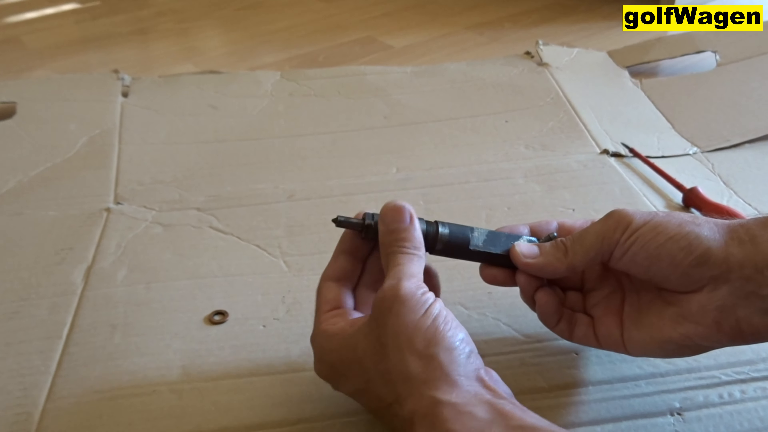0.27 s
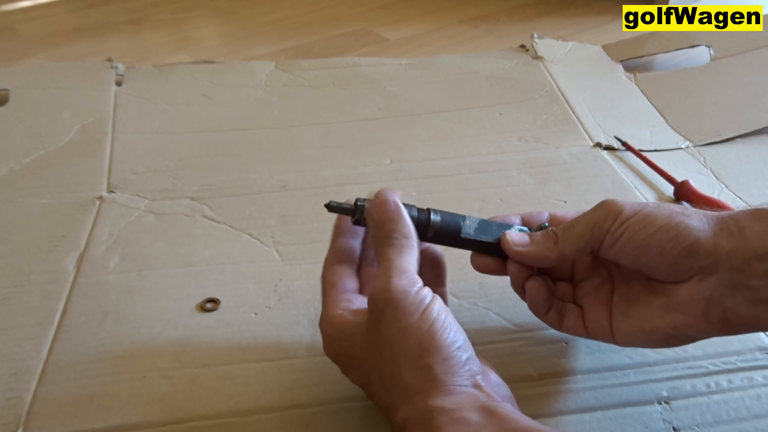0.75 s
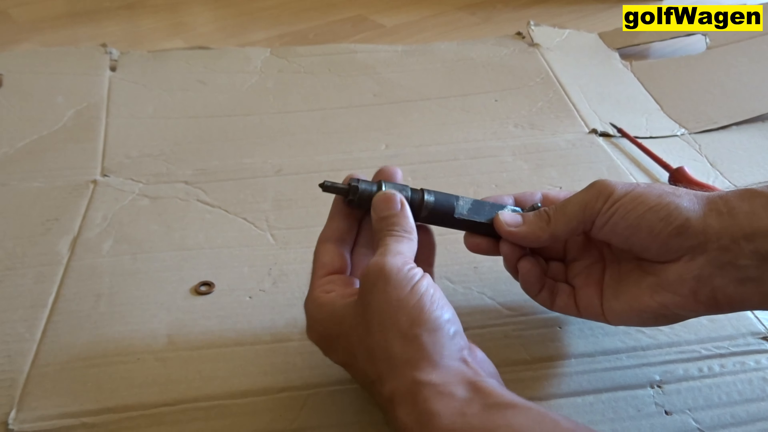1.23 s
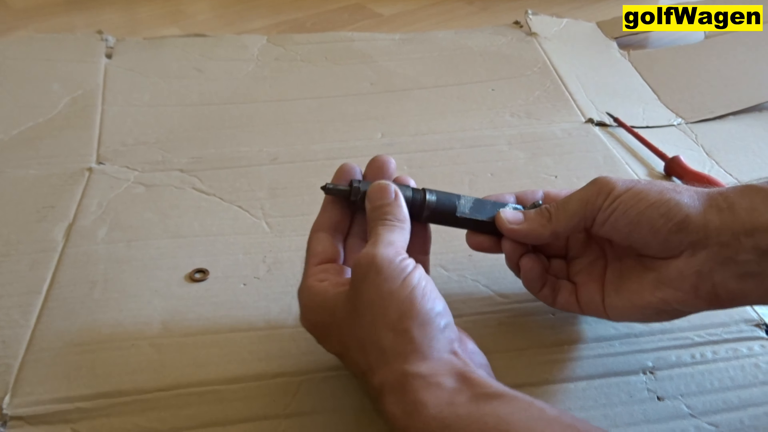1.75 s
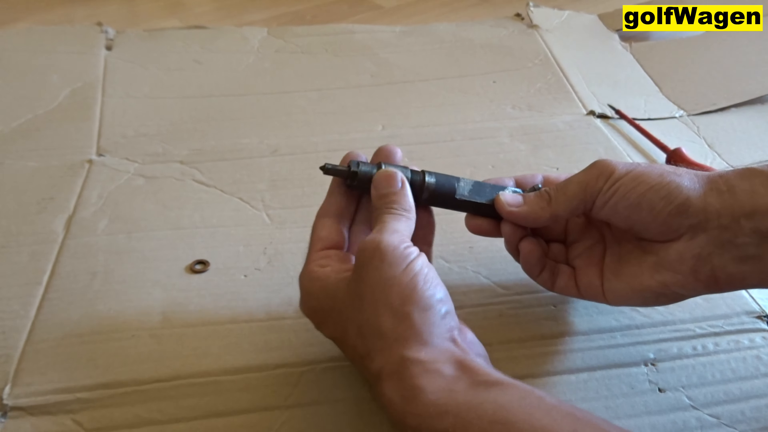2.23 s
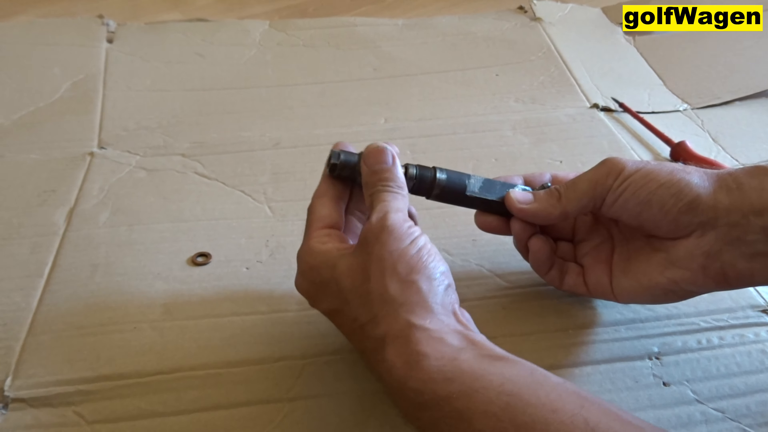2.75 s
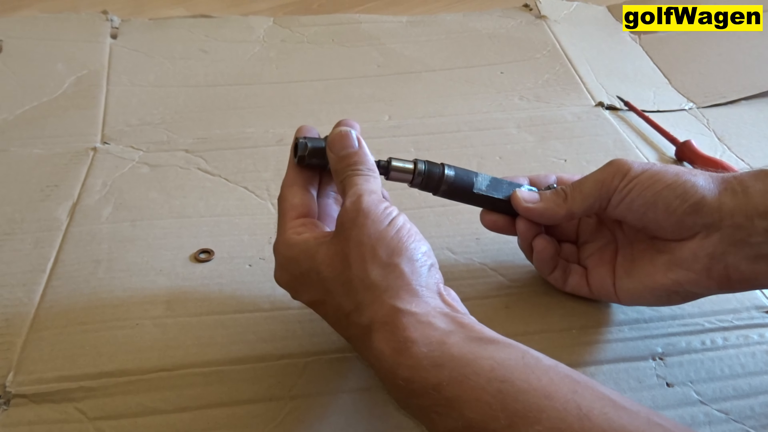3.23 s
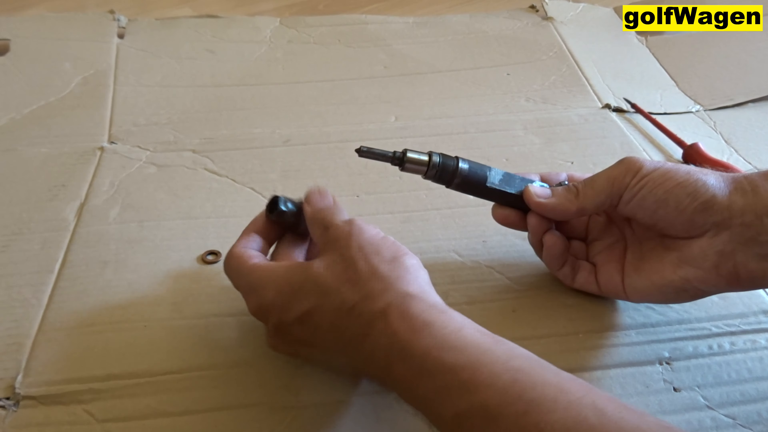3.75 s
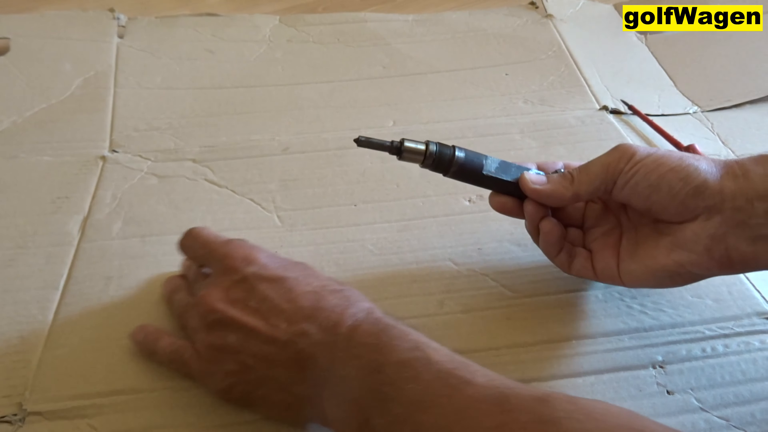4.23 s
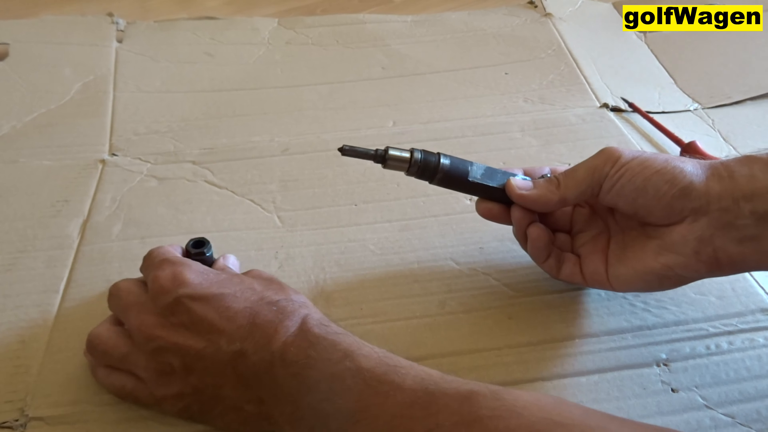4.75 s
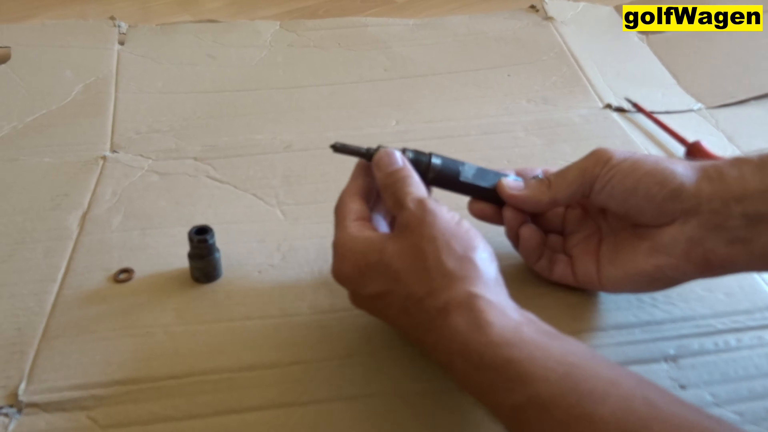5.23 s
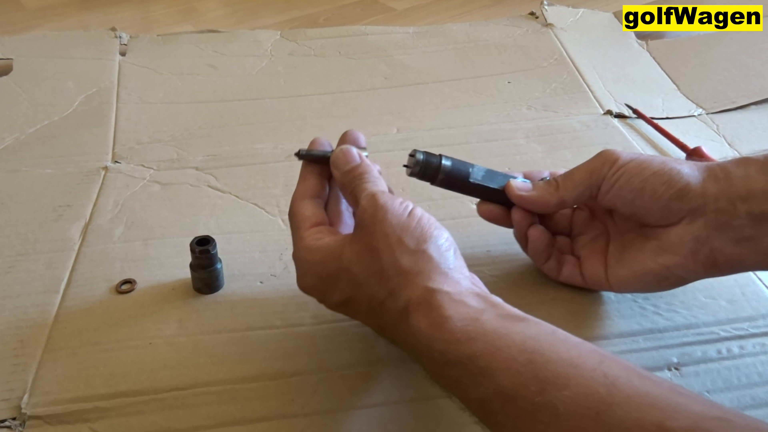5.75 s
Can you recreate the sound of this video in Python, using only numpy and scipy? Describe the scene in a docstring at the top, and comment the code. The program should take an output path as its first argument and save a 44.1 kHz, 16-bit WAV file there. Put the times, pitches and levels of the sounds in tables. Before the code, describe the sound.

A small, quiet room with a soft low hum and faint air noise, heard close in stereo with a light, short reverberation. From 0 to 2.3 s a steel nut is turned by hand in about ten short twists, roughly four per second: thin, dry, high rasps that rise slightly in pitch mid-twist, with crisp ticks between them, growing louder from 1.5 s. A dense burst of bright clicks at 2.3 to 2.5 s marks the nut coming loose; it chatters and clinks with faint ringing at 2.76 and 3.05 s, then a tiny tick at 3.4 s. From 3.8 s skin hisses on cardboard; hollow, woody taps fall at 4.1 to 4.2 s with a stronger papery scrape, and softer taps at 4.6 to 4.7 s. Small brushes follow until 5.2 s, then weak ticks around 5.35 to 5.6 s, soft shuffling, and a faint silky finger glide on steel at 5.8 s.

```python
"""Steel nut twisted off a diesel injector

Heard close up in a small workshop: hand twists rasp as random slips drive thread resonances, and parts tick.
The freed nut chatters off along the nozzle in its own modes, then is stood on cardboard with hollow taps.
A hand brushes the sheet, then fingers slide along the nozzle, both as filtered friction slips.
Shaped noise and narrow low bands make the quiet room hum; noise tails make the reverberation."""
import sys
import numpy as np
from scipy import signal
from scipy.fft import rfft, irfft, next_fast_len
from scipy.io import wavfile

SR = 44100
rng = np.random.default_rng(int(sys.argv[2]) if len(sys.argv) > 2 else 0)


def log_audio(samples):
    """Write samples as a 16-bit WAV file to the path given in sys.argv[1]."""
    # one column per channel
    frames = np.atleast_2d(samples).T
    # limit to full scale, then quantise
    limited = np.clip(frames, -1, 1)
    pcm = np.round(limited * 32767).astype(np.int16)
    wavfile.write(sys.argv[1], SR, pcm)


N = 263717
TIME = np.arange(N) / SR
MID_SIDE = np.array([[1], [-1]])  # sign of the side signal in left and right

# resonances of the injector body: (f/Hz, width/Hz, gain/dB)
BODY_MODES = [(1480, 100, 5.5), (2070, 180, -4.5), (2560, 140, 7), (2840, 1150, 5), (3530, 240, 4.5),
              (4220, 340, -8), (5050, 370, 0.5), (5900, 400, -6), (6400, 270, -18)]
# high resonances of the steel at the thread: (f/Hz, width/Hz, gain/dB)
THREAD_MODES = [(8880, 100, -4.5), (10370, 170, -6), (11180, 135, 1.5), (11630, 120, 0), (12700, 450, -9),
                (14100, 210, -27)]
# resonances of the cardboard sheet: (f/Hz, width/Hz, gain/dB)
SHEET_MODES = [(840, 110, -14), (1000, 45, -1.5), (1133, 120, -2), (1270, 160, -3), (1485, 170, -1),
               (1813, 270, -3.5), (2360, 420, -7)]


def undb(db):
    """Decibels to gain."""
    return 10 ** (np.asarray(db) / 20)


def unit(x):
    """Scale to rms 1."""
    return x / np.sqrt(np.mean(x ** 2))


def crest(x):
    """Scale to peak 1."""
    return x / np.abs(x).max()


def band(x, kind, hz, order):
    """Butterworth filter."""
    sos = signal.butter(order, np.minimum(hz, SR / 2 - 1), kind, fs=SR, output="sos")
    return signal.sosfilt(sos, x)


def colour(x, points):
    """Filter by a spectrum of (f/Hz, gain/dB) points, joined on a logarithmic frequency axis."""
    hz, db = np.transpose(points)
    size = next_fast_len(len(x))
    bins = np.maximum(np.fft.rfftfreq(size, 1 / SR), 1)
    gain = undb(np.interp(np.log(bins), np.log(hz), db))
    return irfft(rfft(x, size) * gain, size)[:len(x)]


def resonate(x, modes):
    """Drive a set of damped modes side by side."""
    out = 0
    for hz, width, db in modes:
        out = out + undb(db) * signal.lfilter(*signal.iirpeak(hz, hz / width, fs=SR), x)
    return out


def walk(rate):
    """Random wander in straight lines between normal draws, rate per second; overall spread about 1.4."""
    knots = np.arange(0, TIME[-1] + 1, 1 / rate)
    return 1.71 * np.interp(TIME, knots, rng.standard_normal(len(knots)))


def wavering(x, modes, depth_db, rate):
    """As the contact point travels, each mode is driven now more, now less."""
    return sum(resonate(x, [mode]) * undb(depth_db * walk(rate)) for mode in modes)


def slips(rate, spread_db, patchy_db, patch_rate):
    """Friction: tiny slips of uneven size, rate per second on average, that come in louder and softer patches."""
    happens = rng.random(N) < rate / SR
    size = undb(spread_db * np.minimum(rng.exponential(size=N), 4))
    patches = undb(patchy_db * walk(patch_rate))
    return unit(happens * size * rng.standard_normal(N) * patches)


def gesture(s, length, db, growth_db, swell_db, attack_s, release_s):
    """Gain of one hand movement: attack, a hold that leans and arches, release (20 dB per attack or release time)."""
    progress = np.clip((TIME - s) / length, 0, 1)
    edges = np.maximum(s - TIME, 0) / attack_s + np.maximum(TIME - s - length, 0) / release_s
    lean = growth_db * (progress - .5)
    arch = swell_db * np.sin(np.pi * progress)
    return undb(db + lean + arch - 20 * np.minimum(edges, 10))


def add(track, s, sound):
    """Mix a short sound in at time s."""
    start = int(s * SR)
    track[start:start + len(sound)] += sound[:N - start]


def air():
    """Shaped room noise flickers slightly over a low hum of noise ringing in narrow bands."""
    # spectrum of the room noise: (f/Hz, gain/dB)
    spectrum = [(15, -23), (45, -6.5), (80, -4.5), (150, 0), (230, -4), (390, -10.5), (520, -3),
                (750, -8.5), (1200, -16), (2000, -18), (3200, -23), (8000, -26.5), (11000, -25),
                (15700, -26.5)]
    # stereo width of the room noise: (f/Hz, gain of the side signal/dB)
    side_spectrum = [(40, -29), (120, -22), (300, -10.5), (600, -6), (2000, -5.5), (12000, -21)]
    # hum resonances: (f/Hz, width/Hz, gain/dB)
    hum_modes = [(112.6, 7, 3), (543.6, 25, -1), (581, 14, -6)]
    air_db = -54.5
    mid, side = (unit(colour(rng.standard_normal(N), spectrum)) for _ in range(2))
    hum = unit(resonate(rng.standard_normal(N), hum_modes))
    flicker = undb(0.53 * walk(5.31))
    mid = undb(-1.5) * mid * flicker + undb(-8.0) * hum
    return undb(air_db) * (mid + colour(side, side_spectrum) * MID_SIDE)


def thread():
    """Dry threads rasp; the slips ring the steel, and the rasp rises in pitch through the middle of each twist."""
    # twists of the nut: (hold start t/s, hold length/s, rasp level/dB, growth from start to end/dB,
    # mid-twist swell/dB, low body modes relative to the rasp/dB)
    twists = [(0.005, 0.032, -47.5, 0, -1.5, -9), (0.235, 0.13, -50.5, 0, 2, -11),
              (0.548, 0.11, -47.5, 9, -1.5, -8.5), (0.874, 0.18, -48.5, 5.5, -10, -9),
              (1.292, 0.11, -48.5, -2.5, -3.5, -7), (1.568, 0.072, -41, 3.5, -2.5, -13.5),
              (1.795, 0.095, -40.5, 7.5, -2, -17), (2.042, 0.062, -43, -5.5, 1, -13.5),
              (2.265, 0.056, -44, 4, -8, -5), (2.327, 0.03, -33, 3, 0.5, -12)]
    attack_s, release_s = 0.029, 0.034  # time to rise or fall by 20 dB
    effort, body_effort, speed = 0, 0, 0
    for s, length, db, growth_db, swell_db, body_db in twists:
        gain = gesture(s, length, db, growth_db, swell_db, attack_s, release_s)
        effort = effort + gain
        body_effort = body_effort + gain * undb(body_db)
        phase = np.interp(TIME, [s - attack_s, s + length + release_s], [0, np.pi])
        speed = speed + np.sin(phase)
    slow_hz, rise_hz, wander_hz = 10300, 1300, 380
    pitch_hz = slow_hz + rise_hz * speed + wander_hz * walk(40)
    turn = np.exp(2j * np.pi * np.cumsum(pitch_hz) / SR)
    grit = slips(rate=5000, spread_db=2.0, patchy_db=1.5, patch_rate=190)
    # a narrow band of grit that follows the moving pitch
    contact = (band(grit / turn, "low", hz=420, order=2) * turn).real
    steel = wavering(grit, THREAD_MODES, depth_db=2.5, rate=41)
    steel = band(band(steel, "high", hz=8400, order=6), "low", hz=14600, order=2)
    rasp = unit(steel) + undb(-3.0) * unit(contact)
    body = wavering(grit, BODY_MODES, depth_db=4.5, rate=25)
    body = band(band(body, "high", hz=1630, order=2), "low", hz=6000, order=3)
    return effort * rasp + body_effort * unit(body)


def thuds():
    """Flesh meeting flesh as the grip changes: a fading noise push gives a short, low bump."""
    # dull thuds: (t/s, peak level/dB)
    grips = [(0.059, -45.5), (0.156, -68), (1.604, -46)]
    out, t = np.zeros(N), TIME[:8192]
    for s, db in grips:
        push = rng.standard_normal(len(t)) * np.exp(-t / 0.0095)
        bump = band(resonate(push, [(147, 81, 0)]), "low", hz=350, order=2)
        add(out, s, undb(db) * crest(bump))
    return out


def ticks(count):
    """Light contacts at chance moments while the fingers feel for the nozzle."""
    first_s, last_s = 5.35, 5.62
    # strike/dB, knock relative to it/dB, snap relative to it/dB, ring/dB, ring f/Hz
    tick = (-48.5, -12, -6, -53, 11206)
    return [(s, *tick) for s in rng.uniform(first_s, last_s, count)]


def clicks():
    """Each contact cracks, knocks the body and rings a high mode that the fingers damp; gives blows and rings."""
    # steel touching steel: (t/s, strike level/dB, body knock relative to the strike before a fixed lift/dB,
    # snap relative to the strike/dB, ring level/dB, ring f/Hz)
    contacts = [(0.2024, -36, 0, -21, -34, 10260), (0.2088, -45, -6, 7, -50, 10100),
                (0.496, -47, 3, 1, -45, 11600), (0.616, -46, -4, -10, -22.5, 10500),
                (1.2243, -28, -24, -11, -33, 10800), (1.236, -30, -7.5, -20, -36, 11300),
                (1.5295, -40.5, 1, -1, -41, 11200), (1.5414, -19, -22, -6.5, -26, 8690),
                (1.561, -40, -3, -15, -23, 8800), (1.6422, -35, -5, -14, -23, 11200),
                (1.771, -41, -17, 9, -43, 11800), (1.7801, -25, -37, -9, -24, 12200),
                (1.8856, -18, -23, -2.5, -7.5, 11050), (1.9894, -32, -28, -10, -47, 11400),
                (2.1178, -21.5, -18, -22, -35, 8900), (2.313, -23, -2.5, -2, -16, 11100),
                (2.3177, -19, -12, -18, -16, 11300), (2.3218, -17.5, -18, -18, -11.5, 10800),
                (2.3635, -12.5, -13, -11, -18, 9960), (2.4879, -19.5, -7, -23, -8.5, 10200),
                (2.7607, -27, -27, -13, -18, 10040), (2.8392, -45.5, 4, 5, -50, 9950),
                (3.025, -39, -11, -6, -28.5, 10020), (3.0445, -29, -14, -5, -35, 10100),
                (3.0503, -14, -14, -13, -14.5, 10070), (3.1525, -44, -1, 1, -35, 10000),
                (3.4218, -44.5, -8.5, -14, -36, 10130)]
    # resonances of the snap: (f/Hz, width/Hz, gain/dB)
    snap_modes = [(4730, 150, 2), (5280, 270, 7), (5870, 410, 2.5), (6760, 800, -29)]
    overtones_db, knock_lift_db = -11.5, 3.5
    held_t60_s = 0.012
    # once off its thread, at free_s, the nut also rings on faintly
    free_s, free_ring_db, free_t60_s = 2.35, -24, 0.19
    blows, rings, t = np.zeros(N), np.zeros(N), TIME[:16384]
    for s, db, knock_db, snap_db, ring_db, ring_hz in contacts + ticks(count=6):
        # a contact is a cluster of tiny impacts that dies within a few milliseconds
        impacts = np.sign(rng.standard_normal((2, len(t))))
        crack = impacts[0] * np.exp(-t / 0.00055)
        push = impacts[1] * np.exp(-t / 0.00095)
        knock = crest(band(resonate(push, BODY_MODES), "low", hz=4100, order=3))
        snap = crest(band(resonate(push, snap_modes), "low", hz=7340, order=3))
        overtones = crest(resonate(crack, THREAD_MODES))
        blow = undb(-2.5) * crack + undb(knock_db + knock_lift_db) * knock
        blow = blow + undb(snap_db) * snap + undb(overtones_db) * overtones
        decay = undb(-60 * t / held_t60_s)
        if s > free_s:
            decay = decay + undb(free_ring_db - 60 * t / free_t60_s)
        onset = 1 - np.exp(-t / 0.00026)
        ring = np.sin(2 * np.pi * ring_hz * t) * decay * onset
        add(blows, s + .0008, undb(db) * blow)
        add(rings, s + 0.00053, undb(ring_db) * ring)
    return band(blows, "high", hz=1980, order=4), rings


def arms():
    """Hands and forearms shift with a soft, dull shuffle of filtered friction slips."""
    # shifts of position: (hold start t/s, hold length/s, level/dB)
    shifts = [(1.373, 0.5, -63), (1.947, 0.028, -54.5), (2.125, 0.051, -55.5), (4.65, 0.43, -58),
              (5.175, 0.03, -51), (5.39, 0.68, -59)]
    # spectrum of the shuffle: (f/Hz, gain/dB)
    shuffle = [(60, -25), (150, -1), (300, 2), (550, 4), (900, 0.5), (1600, -4.5), (3500, -36), (9000, -42)]
    rustle = unit(colour(slips(rate=2000, spread_db=2.5, patchy_db=1.5, patch_rate=49), shuffle))
    return rustle * sum(gesture(*shift, 0, 0, attack_s=0.025, release_s=0.073) for shift in shifts)


def loose_nut():
    """Off its thread the nut chatters along the nozzle and sings in its own modes."""
    # slides along the nozzle: (hold start t/s, hold length/s, level/dB, growth from start to end/dB)
    slides = [(2.365, 0.014, -24, -2), (2.38, 0.085, -41, -3), (2.518, 0.041, -47, 7),
              (2.62, 0.42, -66, -5), (2.764, 0.026, -42, -10), (3.031, 0.032, -42.5, 11),
              (3.058, 0.11, -48, -20)]
    # resonances of the loose nut: (f/Hz, width/Hz, gain/dB)
    nut_modes = [(3020, 240, -23), (10270, 74, 0.5), (9970, 64, 2), (11000, 300, -7.5), (11500, 180, -33),
                 (12500, 740, -35)]
    chatter = slips(rate=5800, spread_db=3.5, patchy_db=4.0, patch_rate=240)
    singing = unit(resonate(chatter, nut_modes))
    sound = band(singing + undb(-11.0) * chatter, "high", hz=1400, order=3)
    return sound * sum(gesture(*slide, 0, attack_s=.008, release_s=0.018) for slide in slides)


def cardboard():
    """Skin hisses over the paper; the dragged nut catches on its fibres and drives the sheet."""
    # sweeps of hand and nut: (hold start t/s, hold length/s, skin hiss level/dB, sheet scrape level/dB,
    # growth of the scrape/dB)
    sweeps = [(3.777, 0.36, -48, -56, 12), (3.891, 0.043, -45.5, -58, -12), (4.18, 0.25, -39, -37.5, -7),
              (4.625, 0.33, -57.5, -53.5, 9.5), (4.839, 0.049, -49, -61, 7),
              (5.033, 0.025, -55.5, -60.5, 2), (5.125, 0.061, -47, -52, -3.5)]
    # spectrum of skin on paper: (f/Hz, gain/dB)
    skin_spectrum = [(200, -10), (600, -6.5), (1300, -4), (2500, -13), (3200, -4.5), (5000, -7),
                     (6400, -6.5), (8600, -7.5), (9900, 0.5), (11700, 0.5), (13000, -3), (15700, -8.5)]
    skin_attack_s, scrape_attack_s, release_s = 0.034, 0.014, 0.11  # the nut bites faster than skin
    hiss_swell_db, scrape_swell_db = 4.5, -0.5  # change at the middle of a sweep
    skin, drag = 0, 0
    for s, length, hiss_db, scrape_db, growth_db in sweeps:
        skin = skin + gesture(s, length, hiss_db, 0, hiss_swell_db, skin_attack_s, release_s)
        drag = drag + gesture(s, length, scrape_db, growth_db, scrape_swell_db, scrape_attack_s, release_s)
    hiss = colour(slips(rate=16000, spread_db=-3.5, patchy_db=0.5, patch_rate=71), skin_spectrum)
    hiss = unit(band(hiss, "high", hz=160, order=2))
    catches = slips(rate=1400, spread_db=0.6, patchy_db=1.5, patch_rate=110)
    scrape = wavering(catches, SHEET_MODES, depth_db=2.5, rate=30)
    scrape = band(band(scrape, "high", hz=790, order=4), "low", hz=2860, order=8)
    return hiss * skin + unit(scrape) * drag


def bumps():
    """Soft taps on the corrugated sheet: a hollow note at the spot, the sheet's other modes and a thud beneath."""
    # nut and knuckles on the cardboard: (t/s, strike level/dB, resonance at the spot f/Hz, its t60/s,
    # thud relative to the strike/dB)
    taps = [(4.076, -21.5, 790, 0.034, -24), (4.182, -19.5, 928, 0.067, -32),
            (4.188, -20.5, 986, 0.06, -25), (4.199, -28, 990, 0.047, -35), (4.63, -27, 1044, 0.022, -12),
            (4.704, -29.5, 1227, 0.052, -16)]
    out, t = np.zeros(N), TIME[:8192]
    for s, db, hz, t60, thud_db in taps:
        onset = 1 - np.exp(-t / 0.00062)
        spot = np.sin(2 * np.pi * hz * t) * undb(-60 * t / t60) * onset
        push = rng.standard_normal(len(t)) * np.exp(-t / 0.0041)
        sheet = band(resonate(push, SHEET_MODES + [(hz, 220, 5)]), "high", hz=620, order=3)
        sheet = crest(band(sheet, "low", hz=1.57 * hz, order=4))
        thud = crest(band(resonate(push, [(277, 210, 0)]), "low", hz=600, order=2))
        tap = undb(-7.5) * spot + undb(-7.0) * sheet + undb(thud_db) * thud
        add(out, s + 0.00082, undb(db) * tap)
    return out


def fingers():
    """Fingertips glide along smooth steel: dense, tiny slips through a bright spectrum."""
    # strokes along the nozzle: (hold start t/s, hold length/s, level/dB)
    strokes = [(5.822, 0.1, -45)]
    # spectrum of skin on steel: (f/Hz, gain/dB)
    finger_spectrum = [(1500, -13.5), (2700, -28), (3550, -12), (4400, -20), (6200, -19), (8500, -15),
                       (9700, -4), (11100, 2), (13000, -6), (16000, -18)]
    swell_db, attack_s, release_s = 1.5, 0.08, 0.075
    glide = unit(colour(slips(rate=13000, spread_db=0.5, patchy_db=-0.3, patch_rate=60), finger_spectrum))
    return glide * sum(gesture(*stroke, 0, swell_db, attack_s, release_s) for stroke in strokes)


def room(x, wet_db, side_db, first_s):
    """Bare walls return a diffuse tail of decaying noise, much shorter in the treble."""
    low_t60_s, treble_t60_s = .48, 0.078
    t = TIME[:SR // 2]
    noise = rng.standard_normal((2, len(t)))
    low = band(noise, "low", hz=4440, order=1)
    tail = low * undb(-60 * t / low_t60_s) + (noise - low) * undb(-60 * t / treble_t60_s)
    tail = tail * np.clip(t / first_s - 1, 0, 1)  # silent until first_s, full at twice that
    mid, side = (signal.fftconvolve(x, h / np.linalg.norm(h))[:N] for h in tail)
    return undb(wet_db) * (mid + undb(side_db) * side * MID_SIDE)


def scene():
    """Steel held in the air, cardboard below it, all in one room; the thin rings arrive mostly direct."""
    blows, rings = clicks()
    steel_echo = room(blows + undb(-10.5) * rings, wet_db=-9.0, side_db=-26.0, first_s=0.0011)
    rubbing = thread() + thuds() + arms() + loose_nut() + cardboard() + bumps() + fingers()
    rubbing_echo = room(rubbing, wet_db=-7.5, side_db=-13.5, first_s=0.00041)
    return air() + blows + rings + steel_echo + rubbing + rubbing_echo


def record(dry):
    """The left microphone port is a little brighter than the right; a steep low-pass cuts the top."""
    top_hz = 15750
    ports = dry + undb(-19.0) * band(dry, "high", hz=11300, order=1) * MID_SIDE
    return signal.sosfilt(signal.ellip(10, .2, 70, top_hz, fs=SR, output="sos"), ports)


dry = scene()
out = record(dry)
log_audio(out)
```